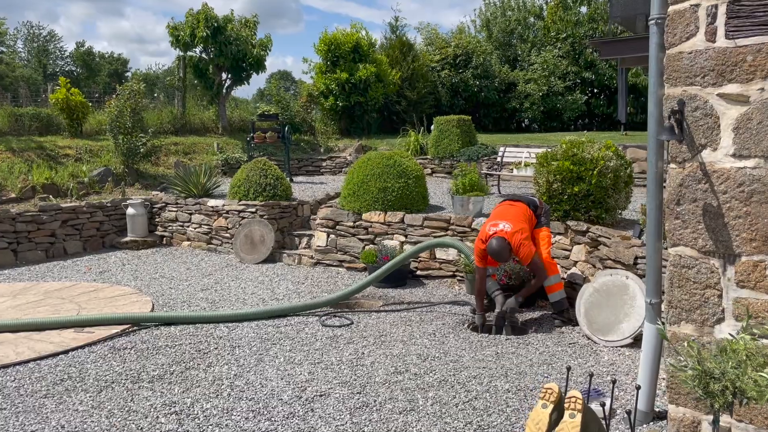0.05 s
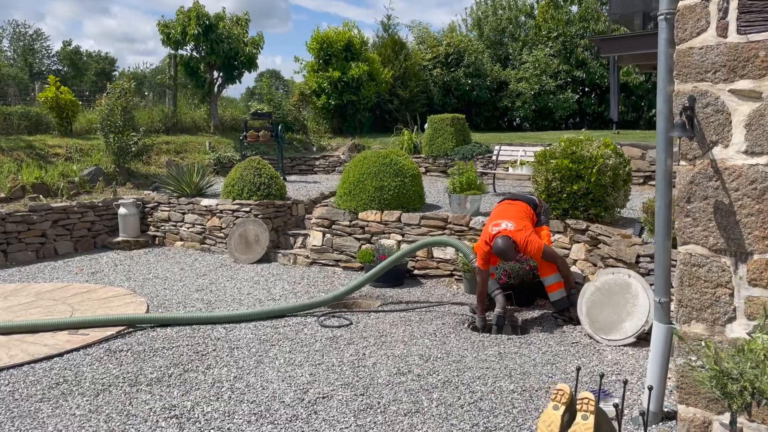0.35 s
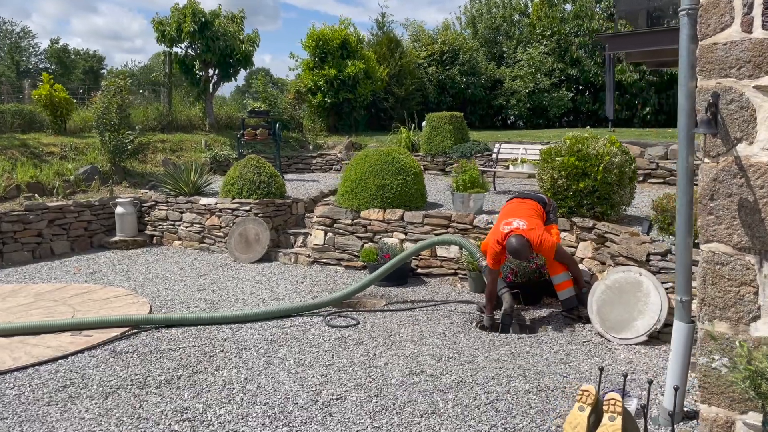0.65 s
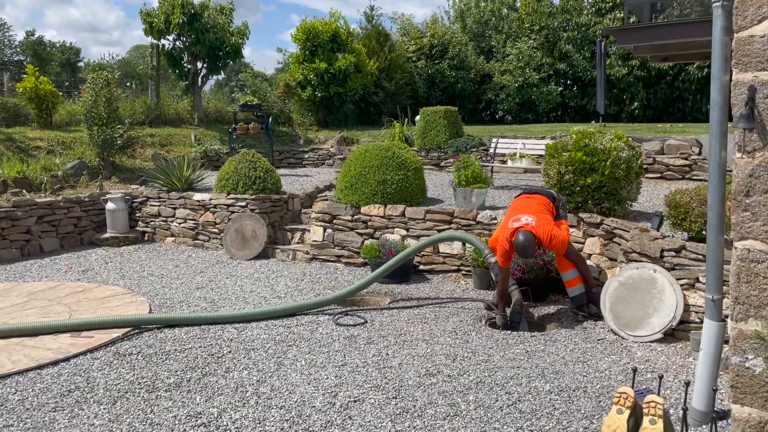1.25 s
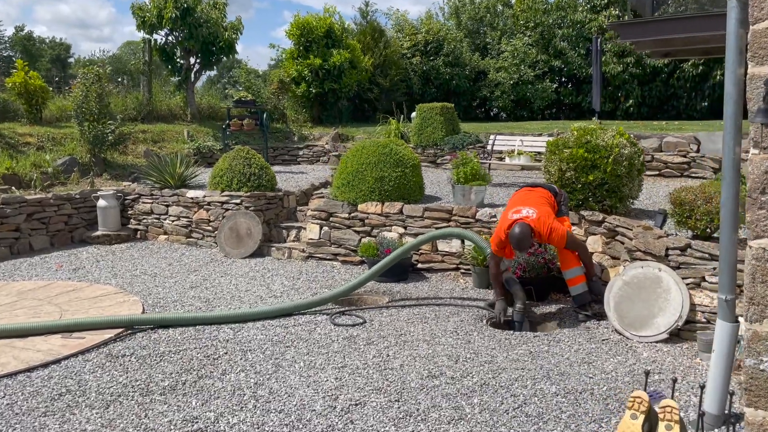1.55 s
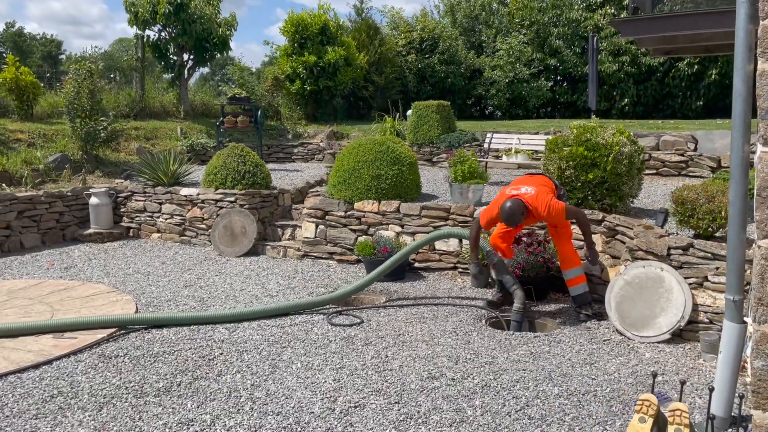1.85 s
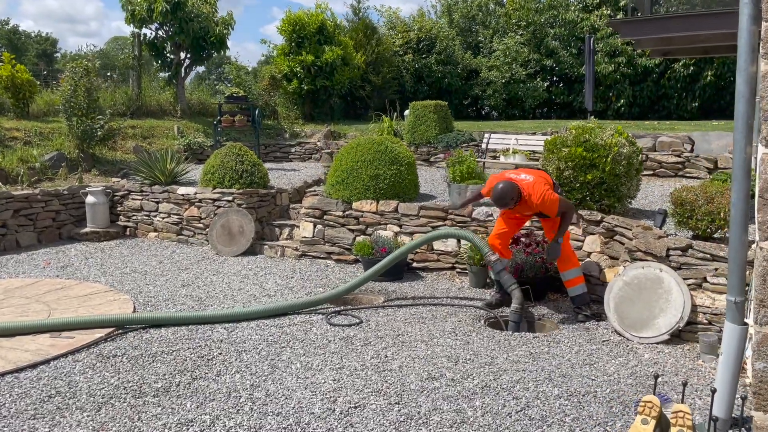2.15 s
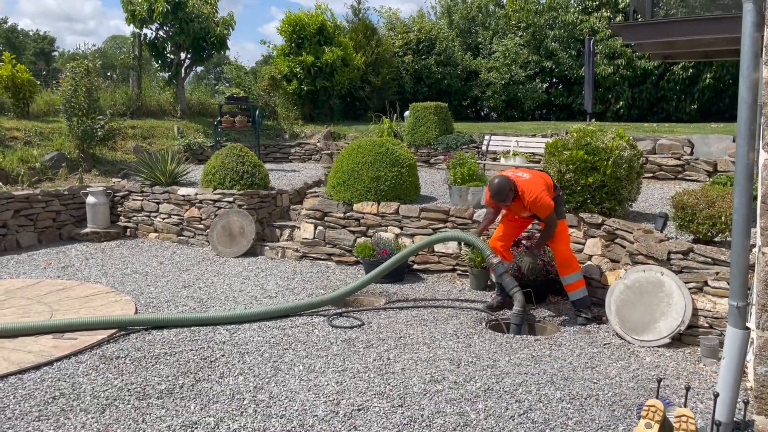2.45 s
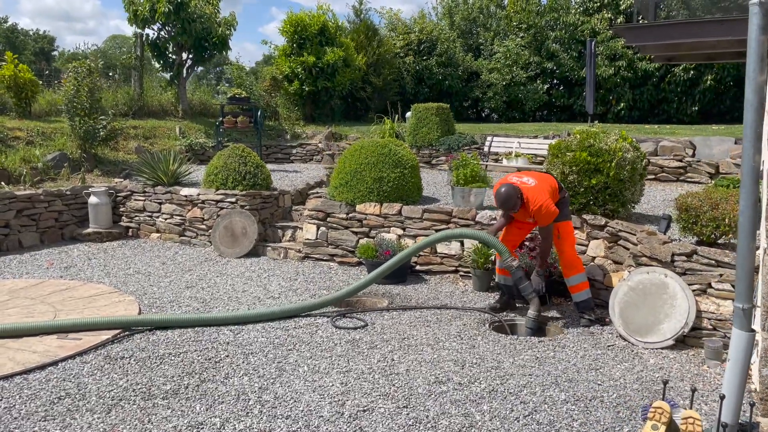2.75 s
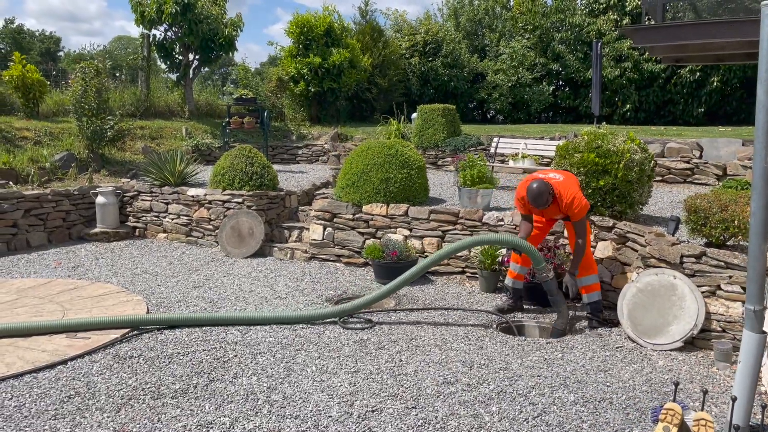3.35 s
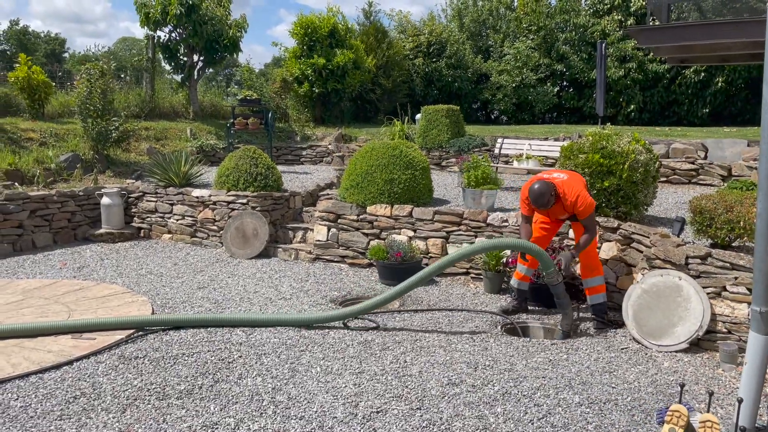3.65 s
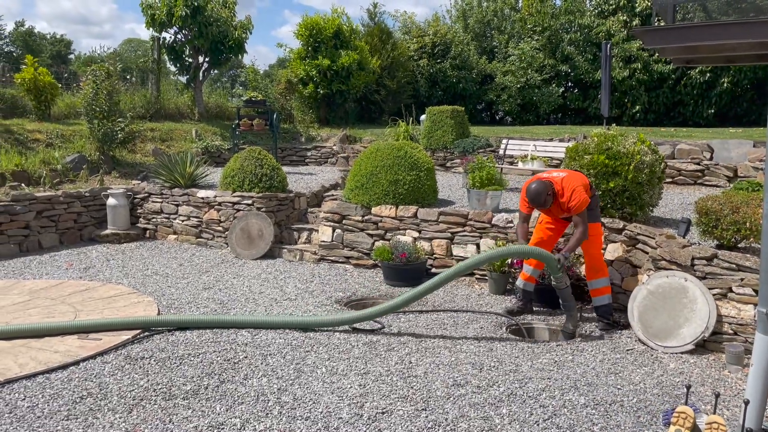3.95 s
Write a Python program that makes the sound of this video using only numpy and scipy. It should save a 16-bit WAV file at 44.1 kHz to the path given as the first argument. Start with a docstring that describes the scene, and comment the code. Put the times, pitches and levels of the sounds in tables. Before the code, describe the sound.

The steady hum and whine of a vacuum truck carries across a garden, heard in stereo. Its hose drones and hisses at a drain, then slurps clear; the pump speeds up slightly, and low thuds, clicks and faint scrapes follow.

```python
"""A gravel garden, heard on a microphone pair, with a vacuum truck running some way off.
The diesel engine and the pump's lobes hum at close pitches over a wash of machinery noise and air.
A worker has the nozzle at a drain: air and water rush in and the hose drones for about a second,
then it clears with a slurp, draws freely, and the pump speeds up. The heavy hose thuds and clicks
as it is moved; gloves and boots scrape softly."""
import sys
import numpy as np
from scipy import signal
from scipy.fft import rfft, irfft, next_fast_len
from scipy.io import wavfile
from scipy.ndimage import uniform_filter1d

SR = 44100
rng = np.random.default_rng(int(sys.argv[2]) if len(sys.argv) > 2 else 0)


def log_audio(samples):
    """Write samples as a 16-bit WAV file to the path given in sys.argv[1]."""
    # one column per channel
    frames = np.atleast_2d(samples).T
    # limit to full scale, then quantise
    limited = np.clip(frames, -1, 1)
    pcm = np.round(limited * 32767).astype(np.int16)
    wavfile.write(sys.argv[1], SR, pcm)


N = 176400
TIME = np.arange(N) / SR

# bed of machinery noise and garden air (frequency [Hz], level [dB per Hz])
WASH_SPECTRUM = [(20, -82), (35, -76.5), (58, -64), (85, -78), (130, -75), (300, -79.5), (450, -78),
                 (700, -82), (1000, -78), (1200, -91), (1600, -81), (1900, -96), (2400, -92.5),
                 (3200, -100), (4400, -101), (5500, -97), (6200, -98), (7200, -102), (9000, -104.5),
                 (11000, -111), (13000, -111), (15500, -109)]
# the diesel's crankshaft (time [s], speed [turns/s])
CRANK_SPEED = [(0.05, 15.423), (0.7, 15.421), (1.1, 15.429), (1.5, 15.505), (1.9, 15.546), (2.6, 15.532),
               (3.3, 15.484), (3.95, 15.448)]
# engine tones that stand out (multiple of the crank speed)
FIRING_ORDERS = [3, 6, 12, 14, 16, 18, 20, 24, 28, 36, 42, 44, 48, 56, 66, 72, 96, 102, 108]
# the same tones, row for row (level under load [dB], level running free [dB])
FIRING_LEVELS = [(-46.5, -45.5), (-51, -45), (-39.5, -41), (-49.5, -55), (-66, -61), (-63, -58), (-59, -60),
                 (-47, -44.5), (-53.5, -60), (-46, -50), (-57, -52.5), (-64, -65), (-52.5, -47),
                 (-69, -59.5), (-60, -55.5), (-71, -61.5), (-70, -62), (-67, -69), (-70, -67)]
# outline of the weak tones from unequal cylinders (frequency [Hz], level [dB])
UNEVEN_SPECTRUM = [(120, -75), (260, -67.5), (500, -67.5), (700, -69.5), (1050, -76.5), (1200, -73),
                   (1400, -78), (1700, -74), (2000, -83), (2400, -82), (3450, -83.5), (4000, -97)]
# the engine's whine, swelling and fading (time [s], level [dB])
WHINE_LEVEL = [(0, -54), (.3, -42.5), (.55, -56.5), (.77, -38.5), (.92, -54.5), (1.1, -47.5), (1.45, -51),
               (1.8, -43), (2.5, -45), (3.1, -52.5), (4, -49)]
# its thinner, higher whine (time [s], level [dB])
HIGH_WHINE_LEVEL = [(0, -58.5), (.5, -52.5), (.7, -58.5), (.88, -54.5), (1.47, -57), (1.68, -51),
                    (2.4, -57), (3, -50), (4, -52)]
# passing of the pump's lobes (time [s], rate [Hz])
LOBE_RATE = [(0.1, 173.05), (0.4, 172.89), (0.97, 173.05), (1.1, 174.93), (1.22, 177.14), (1.5, 176.62),
             (2.3, 175.75), (3.95, 174.69)]
# pump tones (multiple of the lobe rate, level under load [dB], level running free [dB])
PUMP_TONES = [(1, -58, -55), (2, -47.5, -50.5), (3, -41, -38), (4, -60, -68), (5, -60, -55.5),
              (6, -68, -60.5), (9, -69, -66), (10, -58, -64.5), (17, -83, -71.5), (19, -73, -73)]
# gloves and boots (middle [s], half length [s], level [dB], centre [Hz], width [octaves])
SCRAPE_EVENTS = [(1.993, .024, -57.5, 8700, .67), (3.16, .008, -65, 9000, .8), (3.232, .012, -61, 4500, 1),
                 (3.756, 0.0072, -54, 3200, 1), (3.78, 0.0084, -54, 3500, 1),
                 (3.888, 0.0056, -61, 7500, .8)]
# clicks of hose and coupling (time [s], ring level [dB], ring pitch [Hz], snap level [dB])
CLICK_EVENTS = [(1.7314, -42.5, 6440, -46), (1.7352, -54, 11000, -52), (1.751, -45, 5700, -62),
                (1.7745, -49, 3430, -66), (1.7875, -59, 6000, -61), (2.657, -49, 5800, -49)]
# jolts of the hose (time [s], level [dB])
THUD_EVENTS = [(0.563, -31), (1.074, -27), (1.161, -32), (1.356, -28.5), (1.439, -28), (1.504, -27),
               (1.572, -29), (1.648, -35), (2.319, -38), (2.632, -26), (2.729, -33), (2.86, -31),
               (3.105, -35)]
# suction at the nozzle (time [s], gain [dB])
SUCTION_GAIN = [(0, -0.5), (.25, -1), (.31, 0.5), (.43, 1.5), (.5, -3), (.58, 0), (.8, -1.5), (1.04, -3),
                (1.11, -6.5), (1.16, -16), (1.35, -17), (1.7, -40), (4, -63)]
# air and water in the nozzle at a suction gain of 0 dB (frequency [Hz], level [dB per Hz])
RUSH_SPECTRUM = [(40, -88), (80, -62), (140, -86), (250, -88), (500, -76), (1000, -86.5), (1500, -79),
                 (1850, -84.5), (2300, -85), (3600, -84), (4700, -85), (5400, -84.5), (6100, -80),
                 (7000, -89.5), (9000, -84.5), (11000, -92.5), (13500, -95.5), (15500, -87)]
# likeness of wash and rush at the two microphones (frequency [Hz], coherence [0..1])
MIC_COHERENCE = [(50, 0.73), (130, 0.56), (300, 0.53), (700, .9), (1400, 0.4), (2500, 1), (4500, 0.76),
                 (7500, 1), (15000, 1)]
# phase across the pair (frequency [Hz], lead of the left [rad])
MIC_PHASE = [(45, 0), (92, .3), (186, .9), (372, 1.4), (526, 1.7), (744, 1.8), (930, 2.25), (1300, 2.25),
             (1600, 3.2), (1900, 4.9), (2500, 6.2), (3400, 7.6), (4700, 6.5), (6000, 7.7), (7600, 9.35),
             (9500, 7.3), (11000, 6.3), (13000, 4.6), (14500, 3.15)]
# balance across the pair (frequency [Hz], left minus right [dB])
MIC_BALANCE = [(50, 1.5), (200, 0), (372, 2.5), (540, 0.5), (744, 2.5), (930, -0.5), (1500, -2.5),
               (1850, -8), (2400, 0), (4400, 0.5), (15000, -0.5)]


def gain_of(db):
    """Decibels to amplitude."""
    return 10 ** (np.asarray(db) / 20)


def unit_rms(x):
    """Scales to an rms of one."""
    return x / np.sqrt(np.mean(x ** 2) + 1e-20)


def curve(points):
    """A time table's value at every sample."""
    return np.interp(TIME, *np.transpose(points))


def at_hz(points, hz):
    """A spectrum table, interpolated on a log-frequency axis."""
    frequency, value = np.transpose(points)
    return np.interp(np.log(hz + 1), np.log(frequency), value)


def add(mix, start, sound):
    """Mixes a sound in at its start time."""
    part = mix[..., round(start * SR):][..., :sound.shape[-1]]
    part += sound[..., :part.shape[-1]]


def wander(rate_hz, size=2048, control_hz=200):
    """Smooth random drift, rms about one, mostly slower than rate_hz."""
    hz = np.fft.rfftfreq(size, 1 / control_hz)
    slow = irfft(rfft(rng.standard_normal(size)) / (1 + (hz / rate_hz) ** 4))
    return np.interp(TIME * control_hz, np.arange(size), unit_rms(slow))


def band_noise(hz, octaves, size=N):
    """Noise in a bell around one frequency."""
    bins_hz = np.fft.rfftfreq(size, 1 / SR) + 1
    bell = np.exp(-.5 * (np.log2(bins_hz / hz) / octaves) ** 2)
    return unit_rms(irfft(rfft(rng.standard_normal(size)) * bell, size))


def airy_noise(spectrum, patch_db, flicker_db, frame=1024, hop=256):
    """Noise at both microphones, with drifting patches and a flicker shared by all pitches."""
    hz = np.fft.rfftfreq(frame, 1 / SR)
    draws = rng.standard_normal((N // hop + 5, len(hz), 5))
    left_re, left_im, apart_re, apart_im, patches = np.moveaxis(draws, 2, 0)
    patches = uniform_filter1d(patches, size=12, axis=0)  # smooth in time
    patches = unit_rms(uniform_filter1d(patches, size=14, axis=1))  # and in frequency
    flicker = unit_rms(uniform_filter1d(rng.standard_normal(len(draws)), size=4))[:, None]
    coherence = at_hz(MIC_COHERENCE, hz)
    left = left_re + 1j * left_im
    right = coherence * left + np.sqrt(1 - coherence ** 2) * (apart_re + 1j * apart_im)
    pair = np.array([left, right]) * gain_of(at_hz(spectrum, hz) + patch_db * patches + flicker_db * flicker)
    _, noise = signal.istft(pair.swapaxes(1, 2), nperseg=frame, noverlap=frame - hop)
    return noise[:, :N] * np.sqrt(1.5 * SR / frame)


def turns_of(speed, jitter=0.0003):
    """Cycles counted up from a speed that trembles slightly."""
    return np.cumsum(curve(speed) * (1 + jitter * wander(6.2))) / SR


def tone(turns, db):
    """One sine of the given rms level, in random phase."""
    return np.sqrt(2) * gain_of(db) * np.sin(2 * np.pi * (turns + rng.random()))


def hum(turns, tones, load, wander_db=.6):
    """Multiples of a machine's rate, each with a level that follows the load."""
    return sum(tone(order * turns, free_db + (loaded_db - free_db) * load + wander_db * wander(2.9))
               for order, loaded_db, free_db in tones)


def wash():
    """The bed behind everything: machinery noise and garden air."""
    return airy_noise(WASH_SPECTRUM, patch_db=1.5, flicker_db=0.4)


def uneven_cylinders(turns, spread_db=3, drift=0.47, size=4096):
    """The cylinders' small differences repeat with every crank turn and slowly change."""
    hz = np.arange(size // 2 + 1) * np.mean(curve(CRANK_SPEED))
    level = gain_of(at_hz(UNEVEN_SPECTRUM, hz) + spread_db * rng.standard_normal(len(hz)))
    level *= (hz > UNEVEN_SPECTRUM[0][0]) & (hz < UNEVEN_SPECTRUM[-1][0])
    phases = np.exp(2j * np.pi * rng.random((3, len(hz))))
    cycles = irfft(level * phases) * size / np.sqrt(2)  # three waveforms, each one turn long
    steady, first, second = (np.interp(turns * size, np.arange(size), cycle, period=size)
                             for cycle in cycles)
    return steady + drift * (first * wander(0.95) + second * wander(0.98))


def engine(load):
    """The diesel, some way off: two whines, firing tones and a weak comb, all locked to the crank."""
    turns = turns_of(CRANK_SPEED)
    whines = tone(60 * turns, curve(WHINE_LEVEL)) + tone(84 * turns, curve(HIGH_WHINE_LEVEL))
    firing = [(order, *levels) for order, levels in zip(FIRING_ORDERS, FIRING_LEVELS)]
    return whines + hum(turns, firing, load) + uneven_cylinders(turns)


def pump(load, surge_s=1.083, width_s=0.033, surge_db=2.5, fade_db_per_s=6):
    """The lobes' tones swell once as the hose clears; the eighth harmonic then sings on and fades."""
    turns, age = turns_of(LOBE_RATE), TIME - surge_s
    swell = gain_of(surge_db * np.exp(-(age / width_s) ** 2))
    onset = np.clip(1 + age / width_s, 0, 1)
    singing = onset * tone(8 * turns, db=-49.5 - fade_db_per_s * np.maximum(age, 0))
    return swell * hum(turns, PUMP_TONES, load) + singing


def scrapes():
    """Gloves on the hose and boots on gravel: soft, brief swells of noise."""
    return sum(gain_of(db) * np.exp(-((TIME - middle) / width) ** 2) * band_noise(hz, octaves)
               for middle, width, db, hz, octaves in SCRAPE_EVENTS)


def hose_clicks(snap_t60_s=0.01, ring_t60_s=0.02, scatter_db=-26, scatter_t60_s=0.18, size=8192):
    """Hose and coupling click: a bright snap, a short ring and a scatter off the stone walls."""
    out, age = np.zeros((2, N)), TIME[:size]
    decay = gain_of(-60 * age / ring_t60_s) + gain_of(scatter_db - 60 * age / scatter_t60_s)
    for start, ring_db, ring_hz, snap_db in CLICK_EVENTS:
        bright = np.array([band_noise(hz=11000, octaves=1.7, size=size) for _ in range(2)])
        snap = gain_of(snap_db - 60 * age / snap_t60_s) * bright
        ring = gain_of(ring_db) * decay * band_noise(ring_hz, octaves=0.57, size=size)
        add(out, start, snap + ring)
    return out


def hose_thuds(rise_s=0.012, t60_s=0.12, stereo_width=0.62, size=16384):
    """Each jolt of the heavy hose gives a low, pitchless boom, a little different at each microphone."""
    out, age = np.zeros((2, N)), TIME[:size]
    envelope = np.minimum(age / rise_s, 1) * gain_of(-60 * age / t60_s)
    envelope_rms = np.sqrt(np.mean(envelope ** 2))
    for start, db in THUD_EVENTS:
        mid, side = (unit_rms(envelope * band_noise(hz=67, octaves=0.39, size=size)) for _ in range(2))
        boom = np.array([mid + stereo_width * side, mid - stereo_width * side])
        add(out, start, gain_of(db) * envelope_rms * boom)
    return out


def hose_drone(hz=221.8, sag_db_per_s=3, roughness=0.097, stop_s=1.04, release_s=.02):
    """The hose drones on one rough note, sagging in level, until it clears."""
    held = .5 - .5 * np.tanh((TIME - stop_s) / release_s)
    note = tone(hz * TIME, db=-38 - sag_db_per_s * TIME)
    return held * note * (1 + roughness * wander(30))


def slurp(peak_s=1.03, peak_db=-54.5, rise_s=1, fade_db_per_s=23):
    """A thin slurp builds until the nozzle clears, then dies away."""
    age = TIME - peak_s
    rise = np.clip(1 + age / rise_s, 0, 1)
    level = gain_of(peak_db - fade_db_per_s * np.maximum(age, 0))
    return rise * level * band_noise(hz=2620, octaves=0.43)


def nozzle_rush(suction):
    """At the drain, air and water rush into the nozzle, louder with more suction."""
    return suction * airy_noise(RUSH_SPECTRUM, patch_db=2, flicker_db=0.54)


def scene():
    """The truck some way off and the work at the drain; suction sets the load on engine and pump."""
    suction = gain_of(curve(SUCTION_GAIN))
    load = np.minimum(suction, 1)
    background = engine(load) + wash() + pump(load)
    drain = hose_drone() + nozzle_rush(suction) + slurp()
    handling = hose_thuds() + hose_clicks() + scrapes()
    return background + drain + handling


def record(dry, low_cut_hz=29, band_limit_hz=15750):
    """The two microphone ports differ in phase and level; then a low cut and the band limit."""
    size = next_fast_len(N + SR // 10)
    hz = np.fft.rfftfreq(size, 1 / SR)
    side = np.array([[.5], [-.5]])  # left and right each take half the difference
    ports = gain_of(side * at_hz(MIC_BALANCE, hz)) * np.exp(1j * side * at_hz(MIC_PHASE, hz))
    low_cut = 1 / np.sqrt(1 + (low_cut_hz / (hz + 1)) ** 10)
    heard = irfft(rfft(dry, size) * ports * low_cut, size)[:, :N]
    band_limit = signal.firwin(511, band_limit_hz, window=("kaiser", 9), fs=SR)
    return signal.oaconvolve(heard, band_limit[None], "same")


dry = scene()
out = record(dry)
log_audio(out)
```